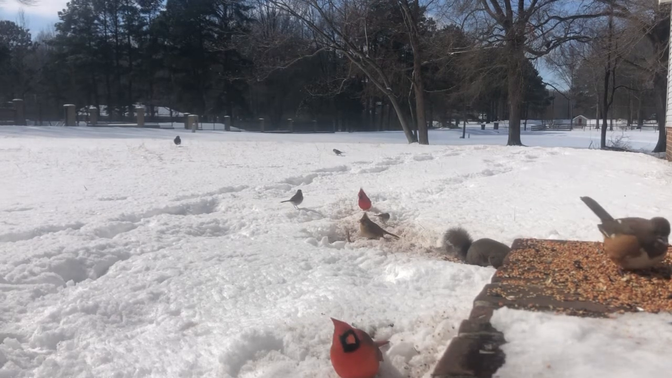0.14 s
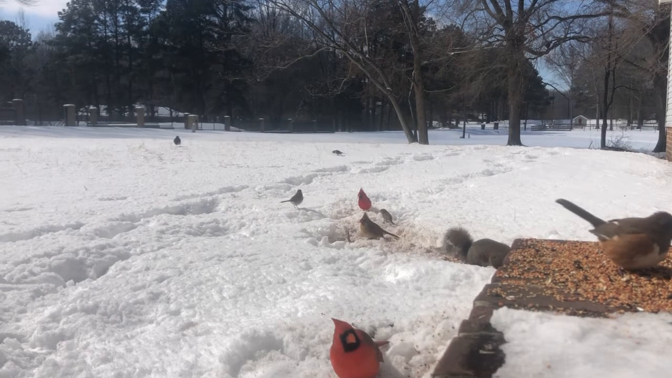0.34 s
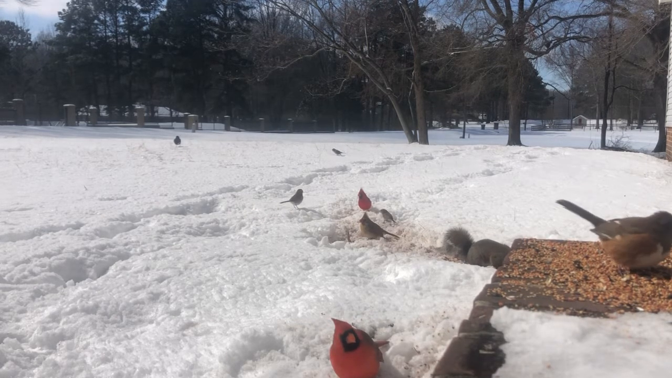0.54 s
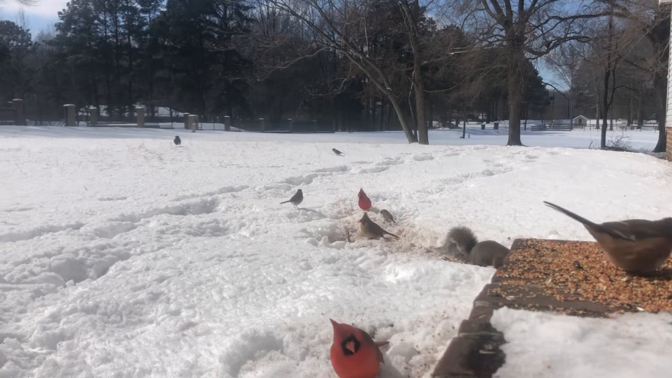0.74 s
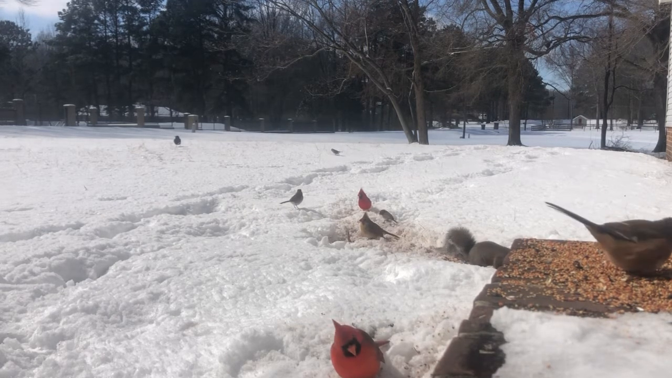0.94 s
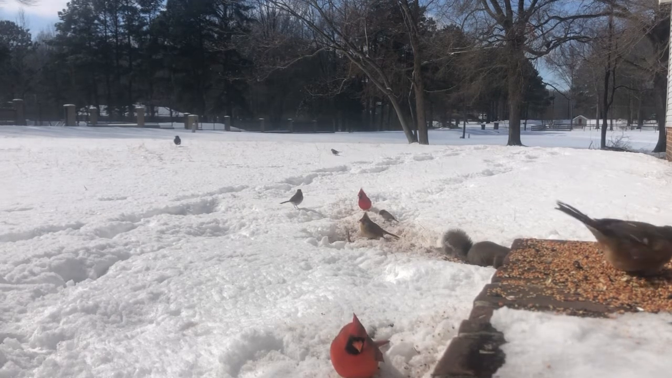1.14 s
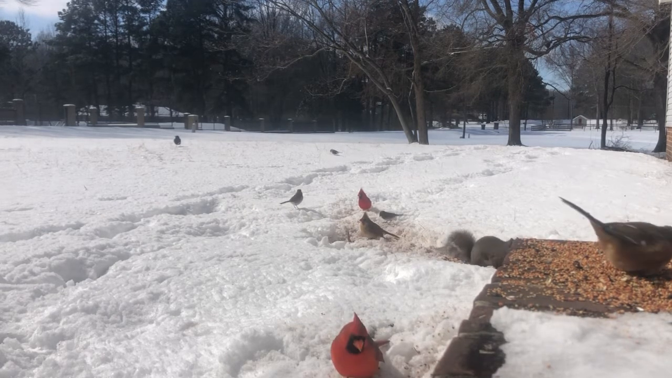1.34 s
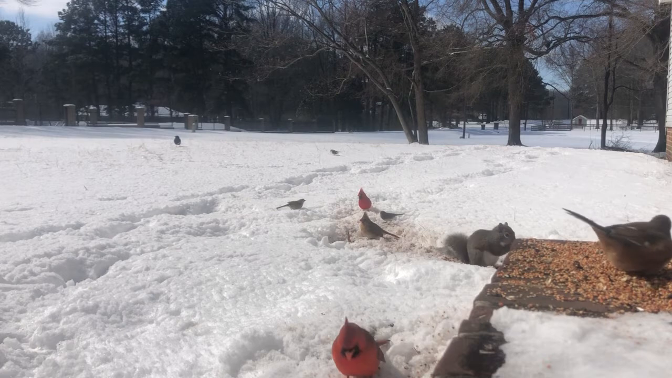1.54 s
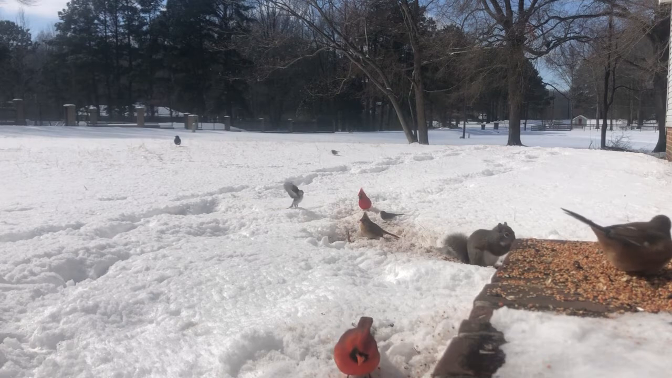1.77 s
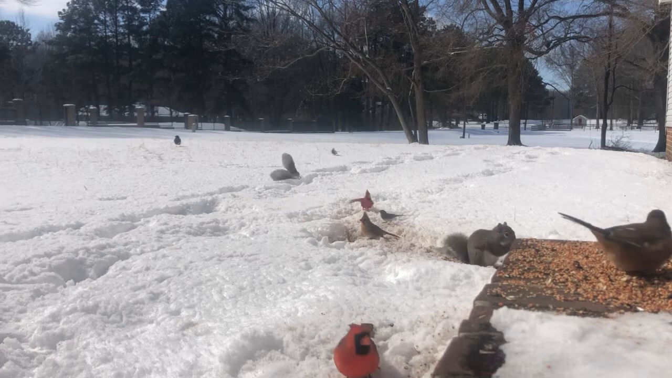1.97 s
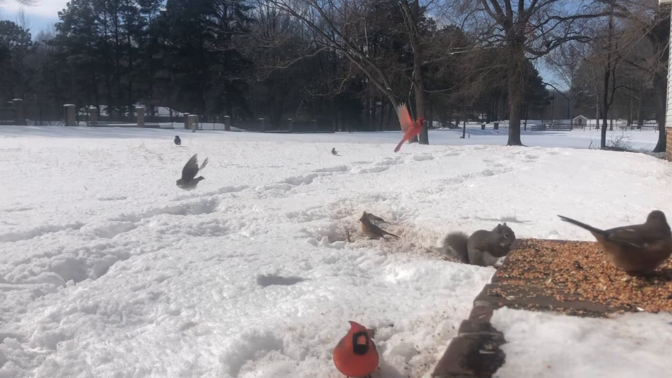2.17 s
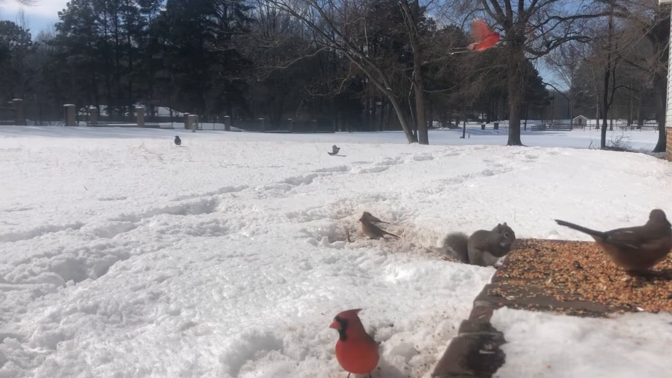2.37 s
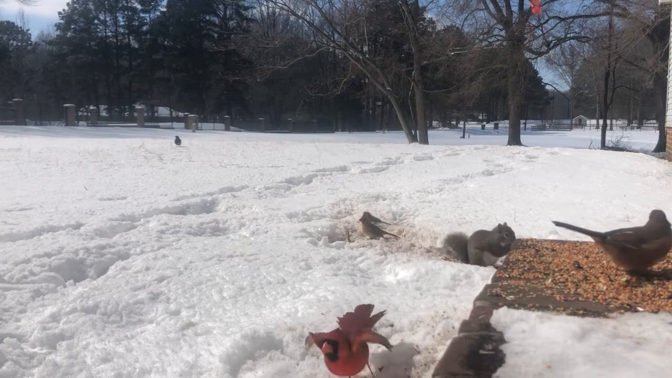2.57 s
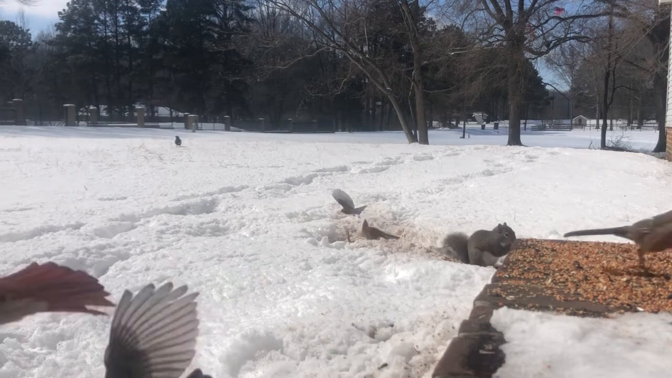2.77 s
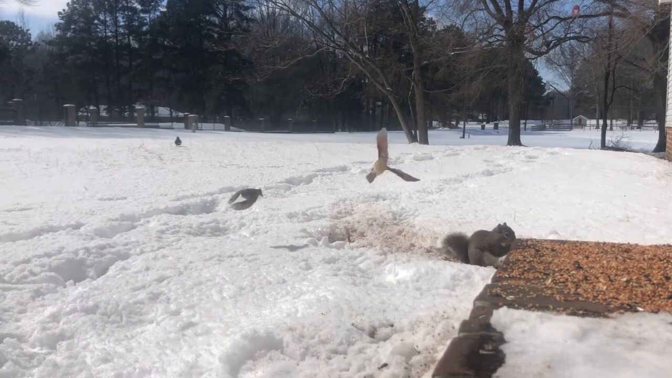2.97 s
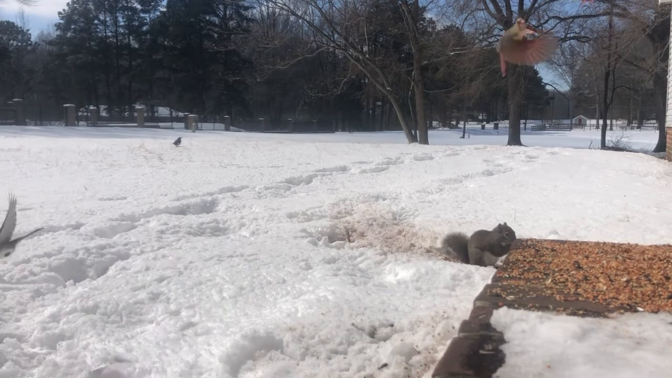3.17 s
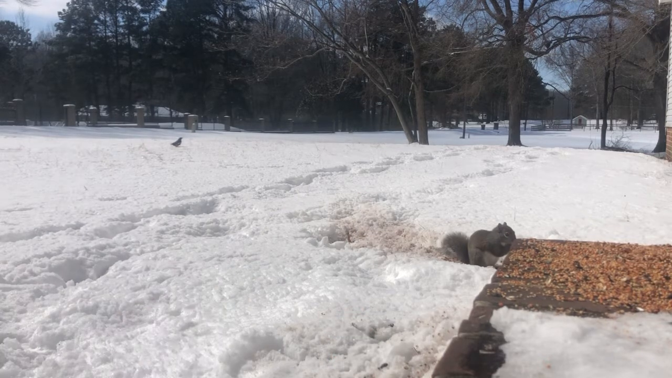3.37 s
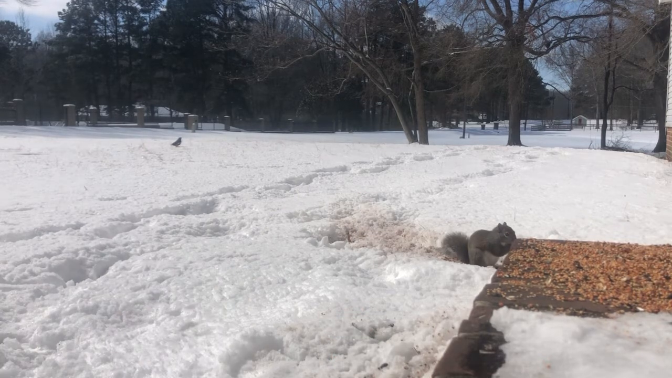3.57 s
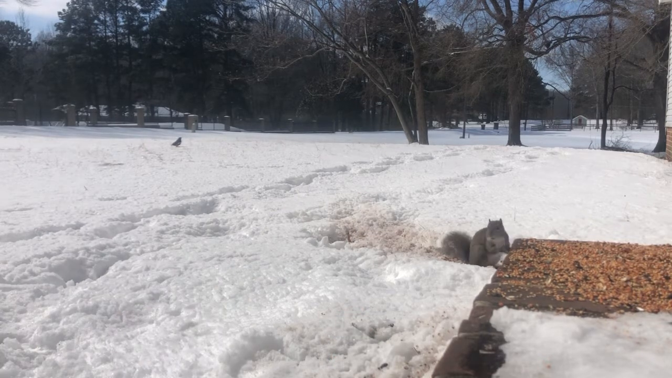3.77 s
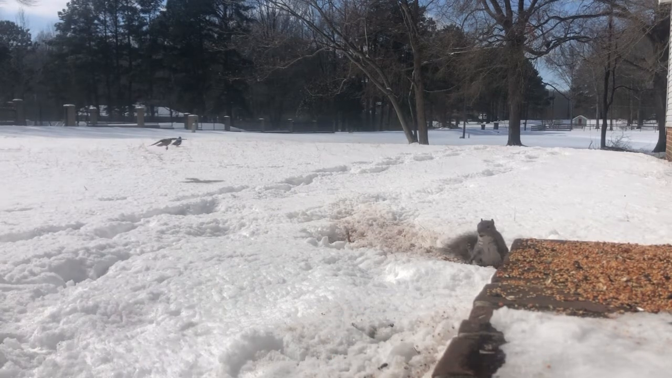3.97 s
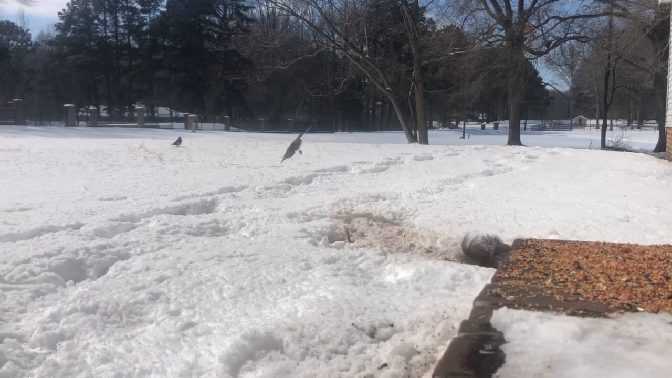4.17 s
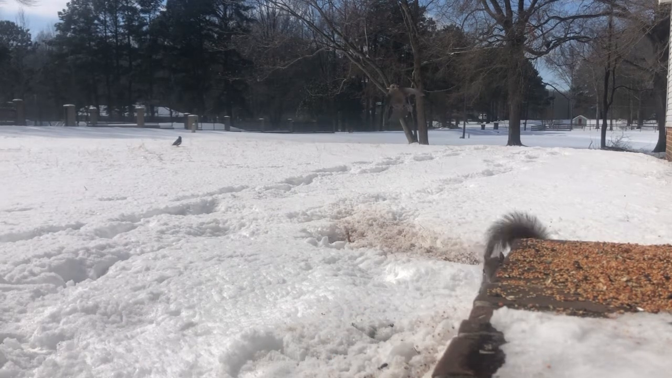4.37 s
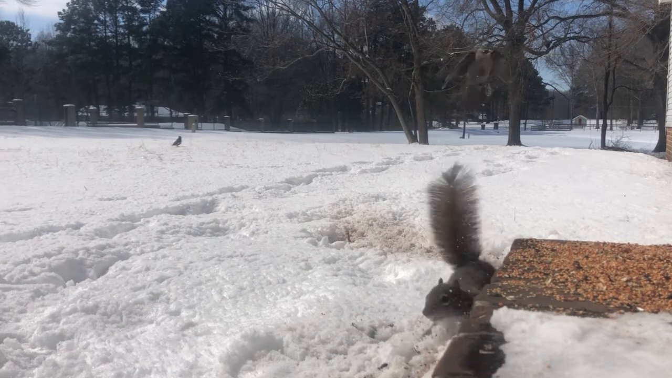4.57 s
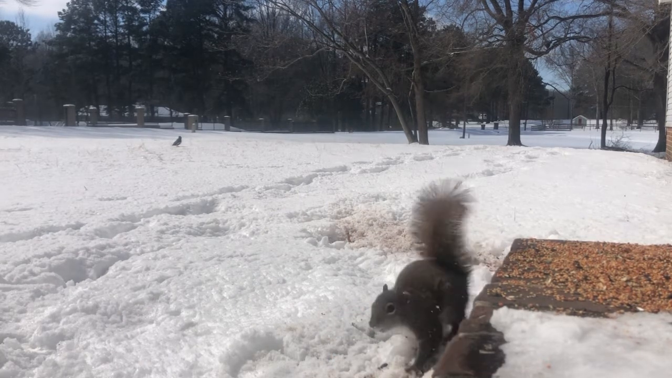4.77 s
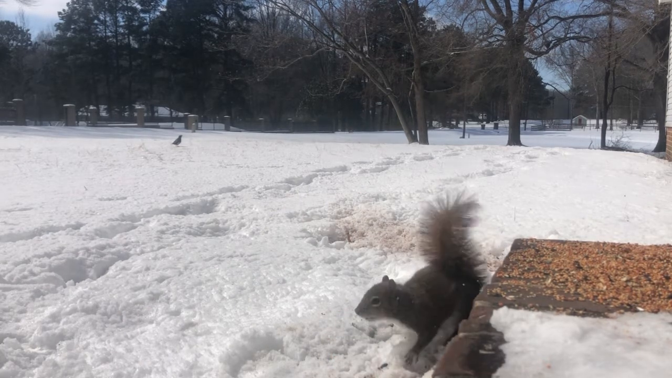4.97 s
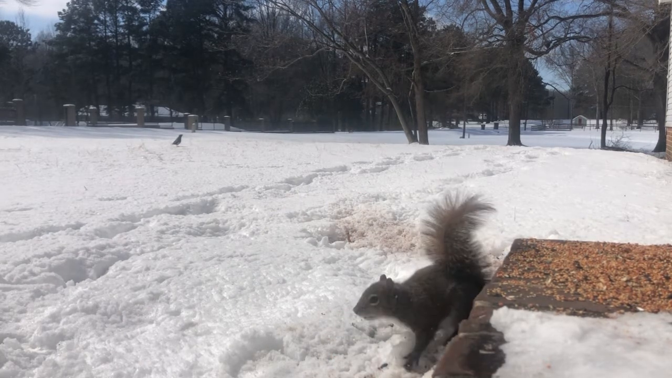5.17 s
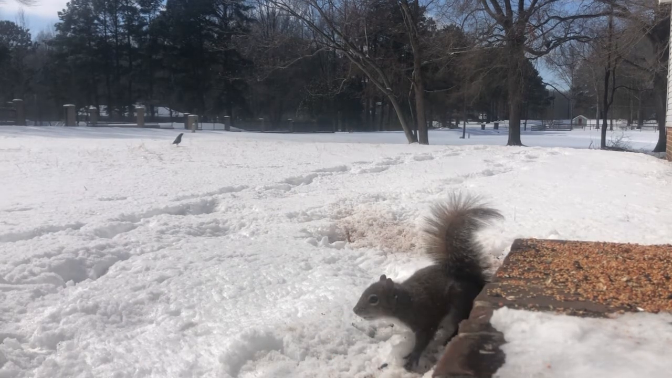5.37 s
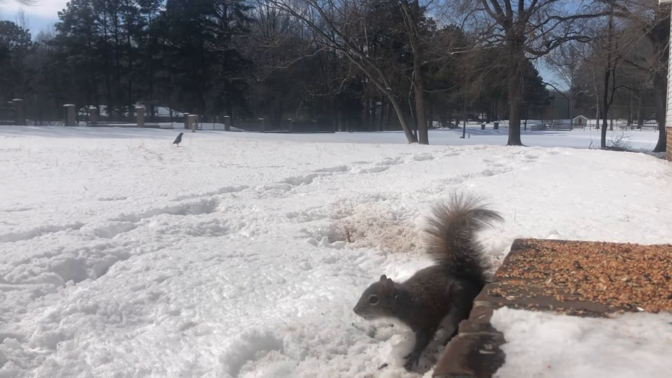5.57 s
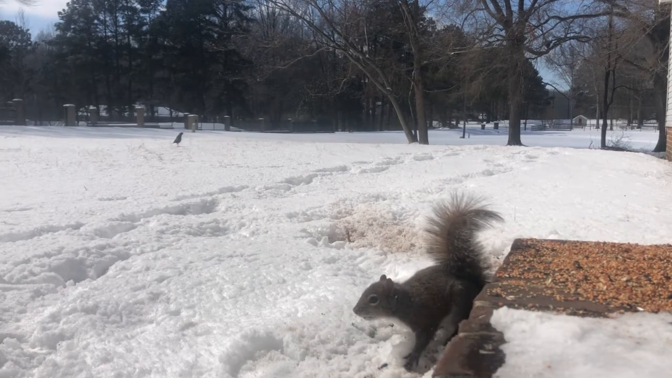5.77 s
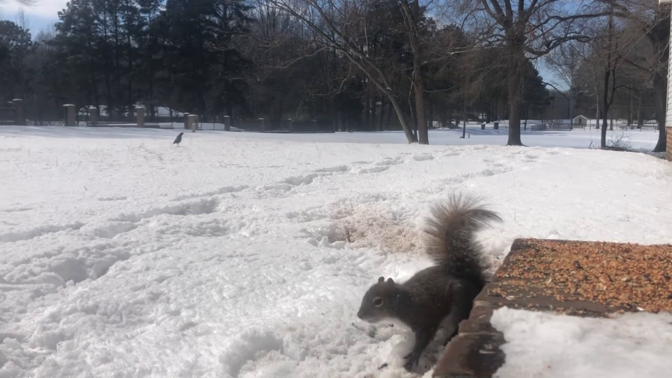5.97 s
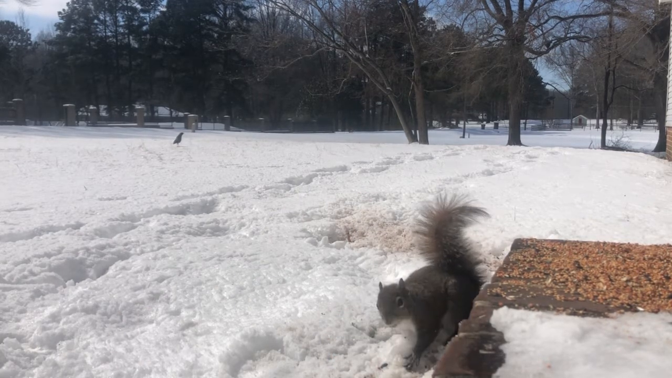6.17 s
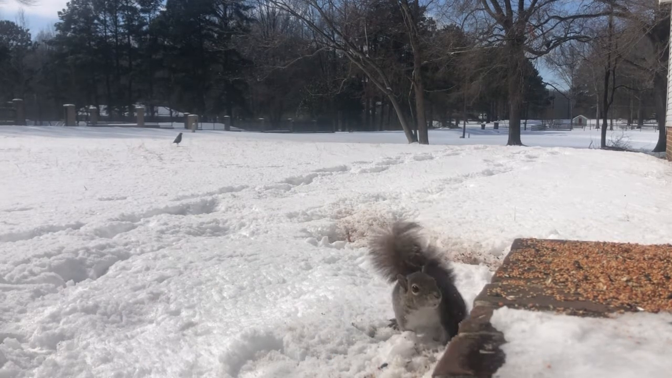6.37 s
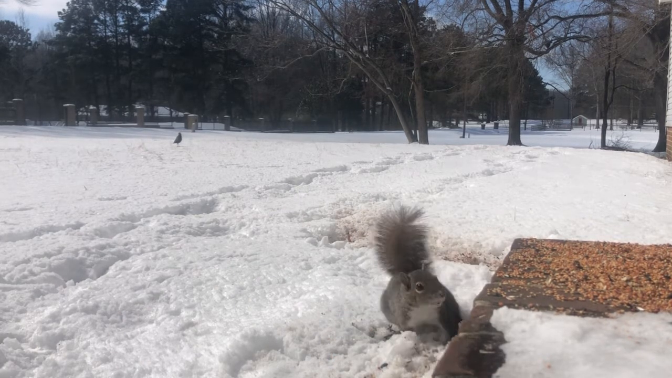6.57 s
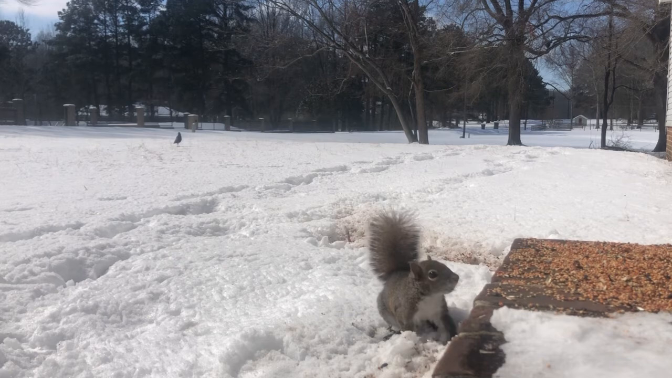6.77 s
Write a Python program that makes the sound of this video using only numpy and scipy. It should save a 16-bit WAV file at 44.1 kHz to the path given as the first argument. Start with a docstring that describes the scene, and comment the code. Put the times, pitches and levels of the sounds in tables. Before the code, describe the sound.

A quiet snowy feeding ledge outdoors, heard closely and almost without reverberation, with a soft low rumble and very faint hiss throughout. From 0 to 1.7 seconds, birds crack seed husks in small dry clicks and knocks, the clearest near 0.4 and 1.3, among crumb ticks, faint drips and soft low bumps. At 1.7 a light wing flutter starts, growing around 2.0 as another bird leaves. At about 2.5 it surges into loud, rapid wingbeats, roughly 24 per second, with airy thumps, feather snaps and hollow pops, strongest around 2.6 to 2.9. Another flutter passes near 3.2 and fades by 4. At 3.5 comes one tiny, piercing chip, sweeping sharply upward, with a faint tail from the trees. From 4.0 to 5.2 a squirrel scuffs crusty snow with soft thuds, crunches and a bright grain tick. Quiet follows, with small scuffs near 6.3 and a faint bump at 6.8.

```python
"""A snowy feeding ledge outdoors, from which songbirds flush one after another, some right past the microphone.
Wing strokes are noise bursts (turbulence, feather snaps) with pressure swings and ringing air pockets;
one bird gives a sharp rising chip, a swept tone with echoes. Seed husks crack as noise bursts with damped modes,
a squirrel scuffs crusty snow as three noise bands, and soft bumps and faint drips of melting snow are damped sines.
Shaped noise gives the low outdoor rumble and faint hiss under it all."""
import sys
import numpy as np
from scipy import signal
from scipy.fft import rfft, irfft, next_fast_len
from scipy.io import wavfile
from scipy.ndimage import uniform_filter1d

SR = 44100
rng = np.random.default_rng(int(sys.argv[2]) if len(sys.argv) > 2 else 0)


def master(y):
    """Save y as 16-bit WAV."""
    cut = np.clip(np.atleast_2d(y).T, -1, 1)
    pcm = np.round(cut * 32767)  # scale
    wavfile.write(sys.argv[1], SR, pcm.astype(np.int16))


N = 301203
TIME = np.arange(N) / SR
SIZE = next_fast_len(N, True)
FREQUENCY = np.maximum(np.arange(SIZE // 2 + 1) * SR / SIZE, 1)

# Noise spectra. Each row: frequency in Hz, relative density in dB per Hz.
# Outdoor background.
OUTDOOR_SPECTRUM = [(20, -27), (31, -29), (42, -7), (68, -2.5), (100, -7.5), (160, -15), (300, -24),
                    (600, -31.5), (1200, -37), (2500, -43), (6000, -46), (16000, -50)]
# Packing of snow, breaking of its crust and scattering of its grains; columns as above.
THUD_SPECTRUM = [(150, 0), (300, -3), (480, 2.5), (800, -7.5), (1400, -26), (3000, -28)]
CRUNCH_SPECTRUM = [(600, -0.5), (1400, -6), (2500, -3), (3800, -0.5), (6000, -4.5), (10000, -16.5)]
HISS_SPECTRUM = [(2500, -12.5), (6500, -2), (10000, 0.5), (13000, 0.5), (15000, 5), (17000, -0.5)]
# Splitting husk; columns as above.
CRACK_SPECTRUM = [(1500, -13), (3000, -11.5), (5000, -3), (8500, 4), (11000, 2), (16000, 1)]
# Stirred air, its hollow flutter between the wings, and the feathers; columns as above.
WHIRL_SPECTRUM = [(90, -13), (150, 3.5), (220, 4), (300, -10), (450, -5.5), (620, -13.5), (1000, -31),
                  (1500, -23.5), (2500, -32.5), (5000, -55)]
FLUTTER_SPECTRUM = [(450, -16), (660, 6), (820, 3), (1050, 3.5), (1300, -4.5), (1600, -14), (2250, -9.5),
                    (3200, -19.5)]
FEATHER_SPECTRUM = [(400, -12.5), (1000, -12), (2500, 0), (4500, -1), (6500, -4), (9000, -4.5), (12000, -6),
                    (15000, -1.5), (17000, -9)]

# Feet and fur scuffing the snow. Each row: centre in seconds, half length in seconds,
# then relative levels in dB of thud, crunch and hiss.
SNOW_SCUFFS = [(0.023, 0.016, -90.5, -83, -73.5), (0.565, 0.046, -93, -78.5, -71),
               (1.132, 0.035, -73, -84, -71), (4.043, 0.031, -62, -59, -66), (4.162, 0.022, -57, -59, -67),
               (4.383, 0.019, -58, -62, -60), (4.395, 0.0034, -73, -68, -47.5),
               (4.466, 0.03, -54, -59, -57.5), (4.617, 0.29, -67.5, -68, -67),
               (4.781, 0.014, -56.5, -56, -54.5), (4.815, 0.012, -64, -58, -69),
               (4.94, 0.0072, -56.5, -56, -56.5), (4.971, 0.0095, -68, -59, -61.5),
               (5.084, 0.0037, -62.5, -56, -68), (5.156, 0.087, -76, -76.5, -77),
               (6.289, 0.0087, -75.5, -60.5, -68), (6.349, 0.015, -73, -64.5, -63.5),
               (6.57, .042, -81, -79, -76)]
# Cracking seed husks. Each row: start in seconds, relative knock level in dB, relative crack level in dB.
HUSK_CRACKS = [(0.136, -80, -65.5), (0.4209, -43, -45), (.569, -71, -60), (.6419, -69, -62),
               (0.7363, -66, -62.5), (0.8268, -66, -74), (.98, -59, -68), (1.2654, -43.5, -63),
               (1.5261, -51, -64.5), (3.67, -68, -47.5), (5.0813, -75, -57), (5.2112, -63, -63)]
# Resonances of a cracked seed. Each row: frequency in Hz, mean relative level in dB, 60 dB decay in seconds.
HUSK_MODES = [(685, -4, 0.0076), (1090, -6.5, 0.013), (1440, -16, 0.027), (2030, 5, 0.0041),
              (2770, 3, 0.0036), (3850, -2, 0.0016)]
# Faint drips of melting snow. Each row: start in seconds, level in dB, frequency in Hz.
MELT_DRIPS = [(.4395, -55, 1300), (.914, -63, 1260), (1.054, -56, 1300), (1.461, -62, 1240),
              (1.591, -58, 1310), (1.736, -55, 1280)]
# Soft bumps on the ledge. Each row: start in seconds, level in dB, frequency in Hz.
LEDGE_BUMPS = [(.545, -42.5, 74), (1.061, -37.5, 105.6), (1.084, -39.5, 144), (6.819, -40.5, 123)]

# Take-offs, each a steady run of wingbeats. Each row: first beat in seconds, end in seconds, beats per second,
# return stroke and air push as shares of the cycle, then levels in dB relative to the loudness for
# main whirl, return whirl, main snap, return snap, air push, wake and rustle,
# and last the hollow share in dB (of flutter relative to whirl, and of pop relative to snap).
TAKE_OFFS = [(1.687, 1.99, 24.5, 0.34, 0.084, 3, -14.5, -4, -19, -2, -12, -13, -20),
             (2.011, 2.43, 24.94, 0.5, 0.068, 2, -10.5, -12, -13, -0.5, -6, -7, -10.5),
             (2.449, 2.85, 23.65, .42, 0.39, 3.5, -8, -10.5, -15, 2, -8.5, -11.5, -10.5),
             (2.911, 3.06, 23.47, 0.37, 0.69, 3, -16, -2.5, -27, 3.5, -6, -13.5, -10),
             (3.0992, 3.89, 22.88, .55, .38, 3, -7.5, -3, -2.5, 3.5, -7.5, -13.5, -5.5)]
# Passing birds. Each row: nearest approach in seconds, loudness there in dB, swell in dB/s, fade in dB/s.
BIRD_PASSES = [(2.15, -53.5, 13, 29), (2.601, -35.5, 125.5, 18.5), (3.24, -38.5, 20, 34.5)]
# Hard wing slaps. Each row: start in seconds, relative levels in dB of snap, hollow pop and whirl,
# snap decay constant in seconds.
WING_SLAPS = [(1.698, -63, -85, -67, 0.0072), (2.068, -62, -78, -59, 0.0022),
              (2.366, -55, -79.5, -72, 0.003), (2.52, -41, -61, -40, .0034), (2.568, -36, -48, -37, .0045),
              (2.58, -45, -53, -36, 0.0021), (2.617, -43, -42, -33, 0.0025),
              (2.66, -31, -35.5, -28.5, 0.003), (2.687, -42.5, -44, -45, .0034),
              (2.736, -39.5, -40, -39, 0.0083), (2.786, -41, -44, -37, 0.0048),
              (2.898, -31, -51, -35.5, 0.0042), (2.995, -43.5, -46.5, -45, 0.0031),
              (3.122, -36, -51, -39.5, 0.0022), (3.212, -42, -43.5, -49, 0.0033)]
# Air pocket between clapping wings. Each row: median frequency in Hz, mean relative level in dB,
# 60 dB decay in seconds.
POCKET_MODES = [(1020, -1, 0.0202), (1403, -6, .014), (2260, -1.5, 0.0077)]
# Wake of the nearest bird sweeping over the microphone. The row: centre in seconds, level in dB,
# half length in seconds.
WAKE_GUST = (2.905, -43, 0.035)
# Echoes of the chip off ledge and wall. Each row: central delay in seconds, level relative to the direct call in dB.
CHIP_ECHOES = [(.0035, -21.5), (.008, -12.5), (0.041, -38), (.055, -41)]

STROKE_SCATTER_DB = 1.1  # standard deviation between strokes
SETTLE_DB_PER_S = 5  # the feathers grow quieter as a bird settles into flight
MAIN_POP_DB, RETURN_POP_DB = -2, 2  # the wings meet mostly on the return stroke
WAKE_LAG_S, DOWNWASH_LAG_S = .04, .11  # the stirred air reaches the microphone after the sound of the wings
DOWNWASH_FOLLOWS, CLOSE_DB = 0.89, -38  # share of the loudness swing that the push takes, counted from a close bird
CHIP_S = 3.5025
CHIP_START_HZ, CHIP_TOP_HZ, CHIP_GLIDE_S = 4850, 8400, .0092  # nominal pitch before waver and Doppler shift
CHIP_ATTACK_S, CHIP_HOLD_S, CHIP_RELEASE_S = .0055, .0265, .003
CHIP_SAG_FROM_S, CHIP_SAG_DB_PER_S = .014, 418  # the call weakens as the pitch levels off
OCTAVE_DB, OCTAVE_SAG_DB_PER_S = -11, 800  # base level, offset for each path
CUTOFF_HZ = 15750


def from_db(db):
    """Logarithmic level: decibels become an amplitude gain."""
    return 10 ** (np.asarray(db) / 20)


def rms_one(x):
    """Normalisation of power: the signal is scaled to unit rms."""
    return x / np.sqrt(np.mean(x ** 2) + 1e-20)


def noise(spectrum):
    """Spectral shaping: white noise takes the given colour at unit rms and falls steeply past its ends."""
    hz, db = np.transpose(spectrum)
    skirts = np.minimum(FREQUENCY / hz[0], 1) ** 2 * np.minimum(hz[-1] / FREQUENCY, 1) ** 2
    gain = from_db(np.interp(np.log(FREQUENCY), np.log(hz), db)) * skirts
    white = rng.standard_normal(SIZE)
    return rms_one(irfft(rfft(white) * gain, SIZE)[:N])


def flicker(rate, depth_db):
    """Random amplitude modulation: a gain of unit power heads for a new value rate times a second."""
    luck = np.clip(rng.standard_normal(N // 10), -2.5, 2.5)
    points = from_db(depth_db * luck)
    return rms_one(np.interp(TIME * rate, np.arange(len(points)), points))


def add(out, s, sound):
    """Superposition: a short sound is summed in at time s."""
    start = max(int(round(s * SR)), 0)
    part = out[start:start + len(sound)]
    part += sound[:len(part)]


def bursts(times, levels_db, rise, decay):
    """Incoherent addition: bursts swell for rise seconds up to each time and die away; their powers sum."""
    t = TIME[:SR // 8]
    shape = np.minimum(t / rise, 1) ** 2 * np.exp(-np.maximum(t - rise, 0) / decay)
    power = np.zeros(N)
    for s, db in zip(times, levels_db):
        add(power, s - rise, (from_db(db) * shape) ** 2)
    return np.sqrt(power)


def evened(x, seconds):
    """Short-term power levelling: chance swells of the noise are divided out, so strokes keep their strength."""
    window = max(int(seconds * SR), 2)
    return x / np.sqrt(uniform_filter1d(x ** 2, window) + 1e-6)


def ring(hz, t60):
    """Free damped oscillation: a sine decays exponentially from height 1."""
    t = TIME[:SR // 5]
    return np.sin(2 * np.pi * hz * t) * from_db(-60 * t / t60)


def outdoors(level_db, heave_db):
    """Broadband ambient noise: a low rumble heaves gently under a faint, steady hiss."""
    air = noise(OUTDOOR_SPECTRUM)
    rumble = signal.sosfiltfilt(signal.butter(2, 160, fs=SR, output="sos"), air)
    return from_db(level_db) * (air - rumble + rumble * flicker(rate=39, depth_db=heave_db))


def snow(thud_db, crunch_db, hiss_db):
    """Granular fracture: each scuff packs the snow, breaks its crust in clumps and scatters fine grains."""
    power = np.zeros((3, N))
    for s, half, *levels in SNOW_SCUFFS:
        near = slice(max(int((s - 6 * half) * SR), 0), int((s + 6 * half) * SR))
        shape = np.exp(-np.abs((TIME[near] - s) / half) ** 1.57)
        power[:, near] += from_db(levels)[:, None] ** 2 * shape
    thud, crunch, hiss = np.sqrt(power)
    crust = crunch * from_db(crunch_db) * noise(CRUNCH_SPECTRUM)
    fine = hiss * from_db(hiss_db) * noise(HISS_SPECTRUM)
    packing = thud * from_db(thud_db) * noise(THUD_SPECTRUM)
    grains = (crust + fine) * flicker(rate=1100, depth_db=3.5)
    return (packing + grains) * flicker(rate=140, depth_db=2.0)


def seeds(knock_db, crack_db, crumbs_per_s, crumb_db):
    """Brittle fracture and modal ringing: husks crack and knock; crumbs tick as a Poisson process during feeding."""
    s, knocks, cracks = np.transpose(HUSK_CRACKS)
    out = bursts(s, cracks + crack_db, rise=.0005, decay=.0005) * evened(noise(CRACK_SPECTRUM), seconds=.001)
    for at, db in zip(s, knocks):
        knock = 0
        for k, (hz, mode_db, t60) in enumerate(HUSK_MODES):
            gain = from_db(mode_db + rng.normal(0, 1)) * (-1) ** k
            knock = knock + gain * ring(hz, t60)
        add(out, at, from_db(db + knock_db) * knock)
    chance = rng.random((300, 2))
    when = np.cumsum(-np.log(chance[:, 0])) / crumbs_per_s
    feeding = when < 1.7
    levels_db = crumb_db + 10 * chance[feeding, 1]
    crumbs = bursts(when[feeding], levels_db, rise=0.00027, decay=0.0011)
    return out + crumbs * noise(HISS_SPECTRUM)


def plops(rows, t60):
    """Single-mode resonance: each row sets off one damped tone, a boom of the ledge or the bubble of a drip."""
    out = np.zeros(N)
    for s, db, hz in rows:
        add(out, s, from_db(db) * ring(hz, t60))
    return out


def loudness(s):
    """Approach and recession: wing noise in dB swells and fades linearly, and the loudest pass sets it."""
    levels = []
    for at, db, swell, fade in BIRD_PASSES:
        before, after = np.maximum(at - s, 0), np.maximum(s - at, 0)
        levels.append(db - max(swell, 0) * before - fade * after)
    return np.max(levels, axis=0)


def wingbeats():
    """Periodic forcing: each cycle has two strokes (s, whirl dB, snap dB, pop dB) and one push (s, dB)."""
    strokes, pushes = [], []
    for (first, end, rate, return_at, push_at, main_db, return_db, snap_db, return_snap_db,
         push_db, _, _, hollow_db) in TAKE_OFFS:
        chance = STROKE_SCATTER_DB * rng.standard_normal((40, 5))
        for s, luck in zip(np.arange(first, end, 1 / rate), chance):
            back = s + return_at / rate
            settled = SETTLE_DB_PER_S * (s - first)
            whirl = loudness(s) + main_db + luck[2]
            back_whirl = loudness(back) + return_db + luck[3]
            snap = loudness(s) + snap_db - settled + luck[0]
            back_snap = loudness(back) + return_snap_db - settled + luck[1]
            strokes.append((s, whirl, snap, snap + hollow_db + MAIN_POP_DB))
            strokes.append((back, back_whirl, back_snap, back_snap + hollow_db + RETURN_POP_DB))
            downwash = CLOSE_DB + DOWNWASH_FOLLOWS * (loudness(s - DOWNWASH_LAG_S) - CLOSE_DB)
            pushes.append((s + push_at / rate, downwash + push_db + luck[4]))
    return np.array(strokes), np.array(pushes)


def rush(blend_s, fade_s):
    """Continuous flow noise: gains of wake, rustle and hollow share; each bird blends into the next."""
    first, end, *_, wake_db, rustle_db, hollow_db = np.transpose(TAKE_OFFS)
    bird = np.maximum(np.searchsorted(first, TIME) - 1, 0)
    window = int(blend_s * SR)
    wake, rustle, hollow = [uniform_filter1d(db[bird], window) for db in (wake_db, rustle_db, hollow_db)]
    rustle = rustle - SETTLE_DB_PER_S * uniform_filter1d(TIME - first[bird], window)
    gust_s, gust_db, gust_half_s = WAKE_GUST
    gust = from_db(gust_db) * np.exp(-((TIME - gust_s) / gust_half_s) ** 2)
    flying = np.interp(TIME, [first[0] - .02, first[0], end[-1], end[-1] + fade_s], [0, 1, 1, 0])
    wake_gain = flying * from_db(wake + loudness(TIME - WAKE_LAG_S)) + gust
    rustle_gain = flying * from_db(rustle + loudness(TIME))
    return wake_gain, rustle_gain, from_db(hollow)


def mottled(x, rate, depth_db):
    """Independent band modulation: each octave swells and fades alone, as feathers meet at ever new angles."""
    octaves = np.clip(np.log2(FREQUENCY / 500), 0, 5)
    spectrum = rfft(x, SIZE)
    total = 0
    for k in range(6):
        band = irfft(spectrum * np.maximum(1 - np.abs(octaves - k), 0), SIZE)[:N]
        total = total + band * flicker(rate, depth_db)
    return rms_one(total)


def air_push(pushes, push_hz, width, push_db):
    """Pressure radiation by a moving wing: each beat sends out one swing, suction and then compression."""
    out, t = np.zeros(N), TIME[:SR // 10] - .05
    for (s, db), luck in zip(pushes, rng.standard_normal(200)):
        pace = np.exp(.2 * luck)
        swing = np.sin(2 * np.pi * push_hz * pace * t) * np.exp(-(t * pace / width) ** 2)
        add(out, s + t[0], from_db(db + push_db) * swing)
    # small wings move the slowest swings of air hardly at all
    return signal.sosfilt(signal.butter(4, 48, "high", fs=SR, output="sos"), out)


def vortex(puffs, puff_hz, width, puff_db):
    """Vortex shedding: each stroke sheds a short, rounded puff; in a row they purr."""
    out, t = np.zeros(N), TIME[:SR // 25] - .02
    for (s, db), luck in zip(puffs, rng.standard_normal(400)):
        pace = np.exp(0.2 * luck)
        puff = np.sin(2 * np.pi * puff_hz * pace * t) * np.exp(-(t / width) ** 2)
        add(out, s + .004 + t[0], from_db(db + puff_db) * puff)
    return out


def claps(pops, clap_db, spread):
    """Cavity resonance: air squeezed between meeting wings pops with a hollow note, varied each time."""
    out = np.zeros(N)
    for (s, pop_db), luck in zip(pops, rng.standard_normal((400, 4))):
        pitch = np.exp(spread * luck[-1])
        pop = 0
        for k, (hz, db, t60) in enumerate(POCKET_MODES):
            pop = pop + from_db(db + 1.4 * luck[k]) * (-1) ** k * ring(hz * pitch, t60)
        add(out, s, from_db(pop_db + clap_db) * pop)
    return out


def wings():
    """Aerodynamic noise: feathers snap at the turn of a stroke, air whirls after, a softer rush fills the gaps."""
    strokes, pushes = wingbeats()
    s, whirl_db, snap_db, pop_db = strokes.T
    puffs = np.array([(at, db) for at, _, _, db, _ in WING_SLAPS] + list(zip(s, whirl_db)))
    pops = [(at, db) for at, _, db, _, _ in WING_SLAPS] + list(zip(s, pop_db))
    wake, rustle, hollow = rush(blend_s=0.2, fade_s=0.24)

    flutter = hollow * mottled(noise(FLUTTER_SPECTRUM), rate=91, depth_db=3.5)
    turbulence = (evened(noise(WHIRL_SPECTRUM), seconds=0.01) + flutter) / np.sqrt(1 + hollow ** 2)
    whirl_bursts = bursts(puffs[:, 0] + .002, puffs[:, 1] - .5, rise=.003, decay=0.0066)
    whirl = (whirl_bursts + wake) * turbulence

    barbs = evened(mottled(noise(FEATHER_SPECTRUM), rate=90, depth_db=4.5), seconds=.002)
    barbs = barbs * flicker(rate=3000, depth_db=2.5)
    slaps = sum(bursts([at + 0.00058], [db + 2], rise=0.00085, decay=decay)
                for at, db, _, _, decay in WING_SLAPS)
    stroke_snaps = bursts(s + 0.00082, snap_db + 1, rise=0.00182, decay=0.0034)
    snap = np.hypot(stroke_snaps, slaps) * barbs
    rubbing = rustle * mottled(noise(FEATHER_SPECTRUM), rate=200, depth_db=1) * flicker(rate=350, depth_db=4.5)

    pushed = air_push(pushes, push_hz=74, width=0.012, push_db=3.0)
    shed = vortex(puffs, puff_hz=305, width=0.0048, puff_db=0)
    return pushed + shed + claps(pops, clap_db=8.5, spread=.14) + whirl + snap + rubbing


def whistle(doppler, octave_db):
    """Frequency modulation: a slightly wavering tone leaps upward and levels off, with its octave."""
    corners = np.cumsum([0, CHIP_ATTACK_S, CHIP_HOLD_S, CHIP_RELEASE_S])
    t = TIME[:SR // 16]
    hz = CHIP_TOP_HZ + (CHIP_START_HZ - CHIP_TOP_HZ) * np.exp(-t / CHIP_GLIDE_S)
    waver = 1 + .005 * np.interp(t * 700, np.arange(50), rng.standard_normal(50))
    phase = 2 * np.pi * np.cumsum(hz * waver * doppler) / SR
    sagging = np.maximum(t - CHIP_SAG_FROM_S, 0)
    envelope = np.interp(t, corners, [0, 1, 1, 0]) * from_db(-CHIP_SAG_DB_PER_S * sagging)
    octave = from_db(OCTAVE_DB + octave_db - OCTAVE_SAG_DB_PER_S * sagging)
    return envelope * (np.sin(phase) + octave * np.sin(2 * phase))


def chip(level_db, near_db, near_t60, far_db, far_t60):
    """Multipath propagation: the call comes directly, off the ledge, and from the trees the bird flies toward."""
    lag = TIME[:SR]
    near = from_db(near_db - 60 * lag / near_t60)
    for delay, echo_db in CHIP_ECHOES:
        # each echo is smeared by the rough surface
        smear = np.exp(-((lag - delay) / (0.282 * delay)) ** 2)
        near = near + from_db(echo_db) * smear / np.sqrt(np.sum(smear ** 2))
    paths = near * rng.standard_normal(SR)
    paths[0] += 1  # direct sound
    trees = from_db(far_db - 60 * lag / far_t60) * rng.standard_normal(SR)
    # sound sent ahead of the flying bird is a little higher, and its high end carries best
    ahead = signal.fftconvolve(whistle(doppler=1.015, octave_db=-3), trees)
    ahead = signal.lfilter(*signal.butter(1, [7000, 11000], "band", fs=SR), ahead)
    out = np.zeros(N)
    add(out, CHIP_S, signal.fftconvolve(whistle(doppler=0.99, octave_db=0.5), paths))
    add(out, CHIP_S, ahead)
    return from_db(level_db) * out


def scene():
    """Linear superposition at one microphone; the snow swallows nearly every reflection."""
    birds = wings() + chip(level_db=-16.5, near_db=-48.5, near_t60=.16, far_db=-63.5, far_t60=.85)
    feeding = seeds(knock_db=1.5, crack_db=12.5, crumbs_per_s=6.7, crumb_db=-60) + plops(LEDGE_BUMPS, t60=0.086)
    ambience = outdoors(level_db=-58, heave_db=0.5) + plops(MELT_DRIPS, t60=0.023)
    return (birds + feeding + snow(thud_db=0.5, crunch_db=-1.0, hiss_db=3.0) + ambience)[None]


def record(dry):
    """Band limiting: a steep elliptic low-pass cuts the top."""
    return signal.sosfilt(signal.ellip(10, .2, 75, CUTOFF_HZ, fs=SR, output="sos"), dry)


dry = scene()
out = record(dry)
master(out)
```